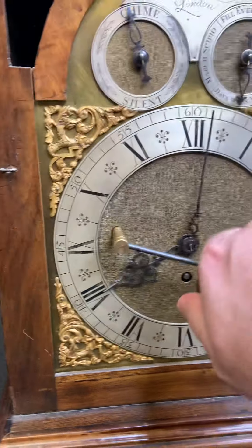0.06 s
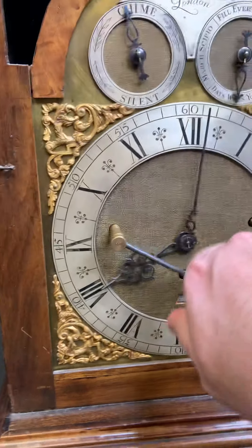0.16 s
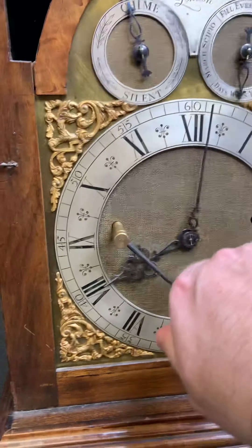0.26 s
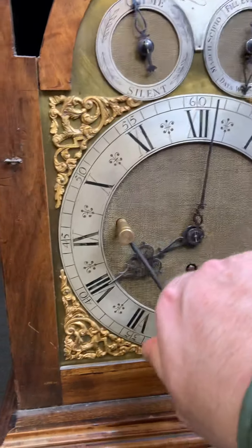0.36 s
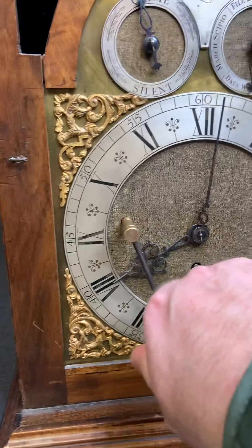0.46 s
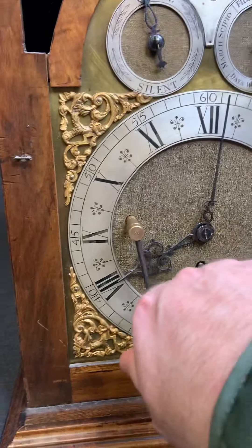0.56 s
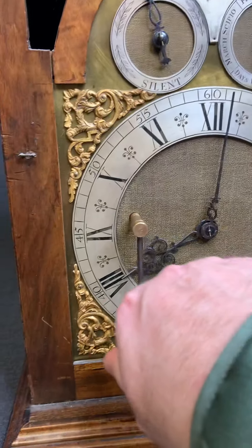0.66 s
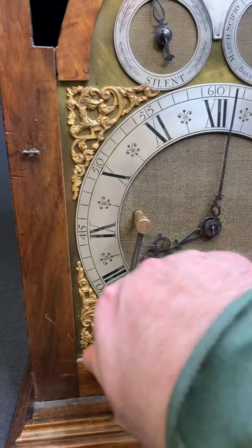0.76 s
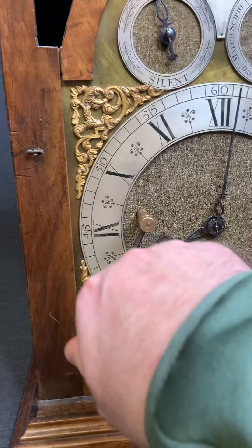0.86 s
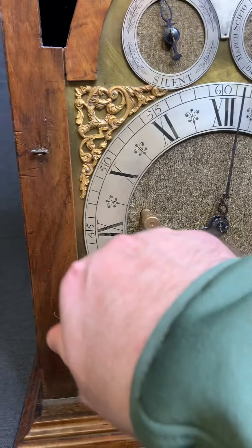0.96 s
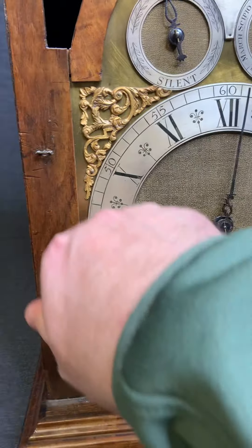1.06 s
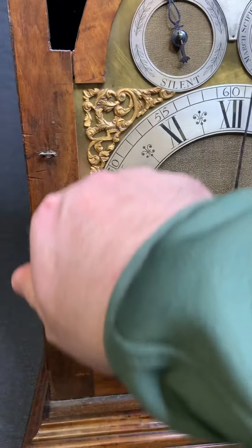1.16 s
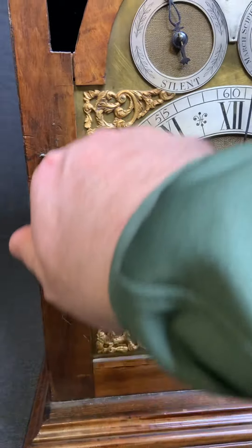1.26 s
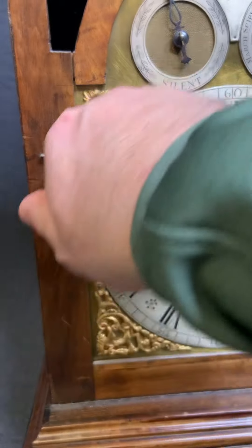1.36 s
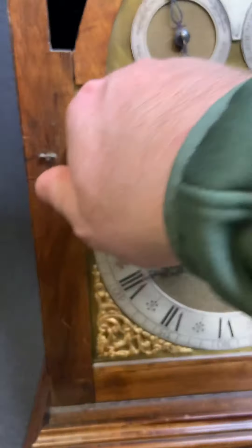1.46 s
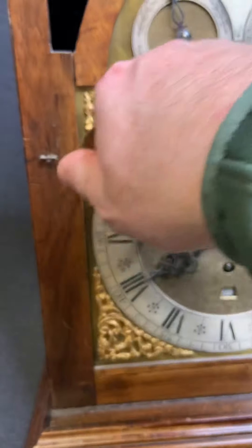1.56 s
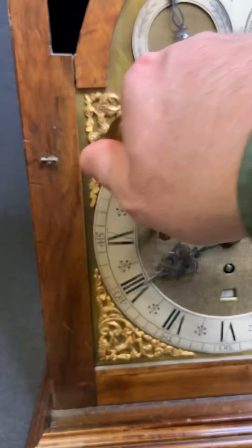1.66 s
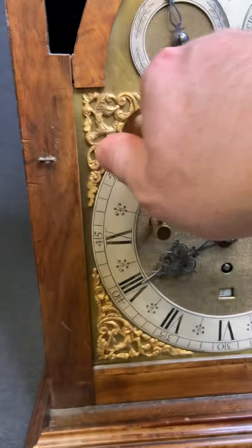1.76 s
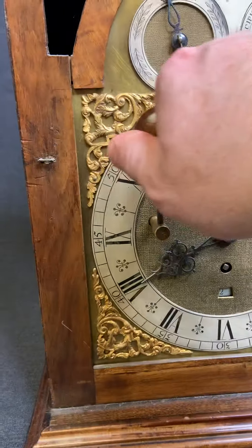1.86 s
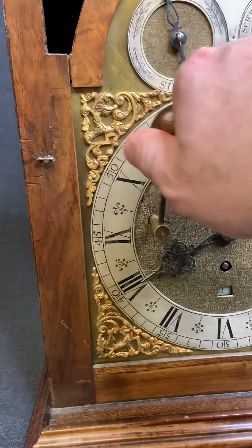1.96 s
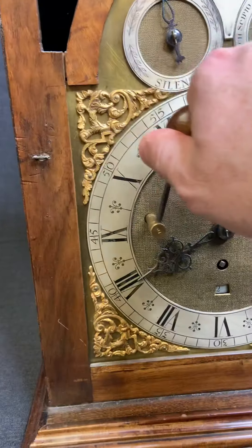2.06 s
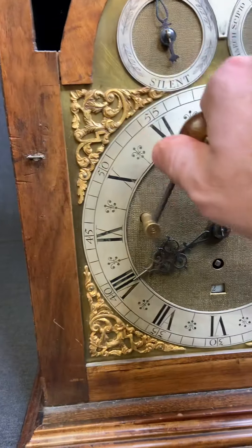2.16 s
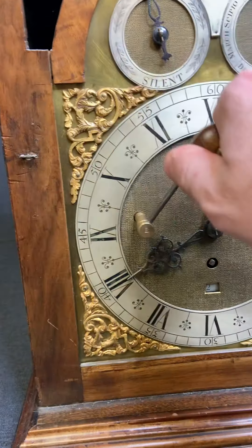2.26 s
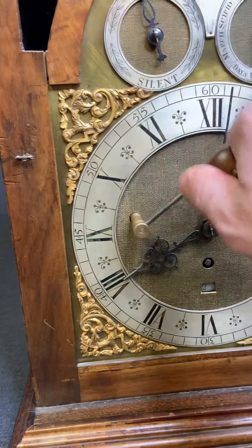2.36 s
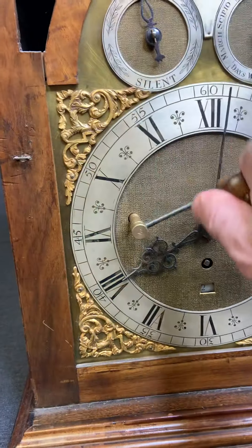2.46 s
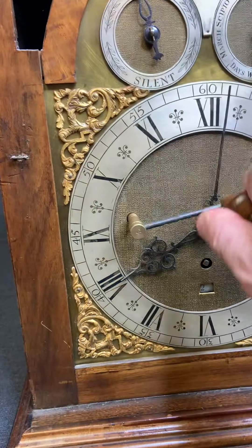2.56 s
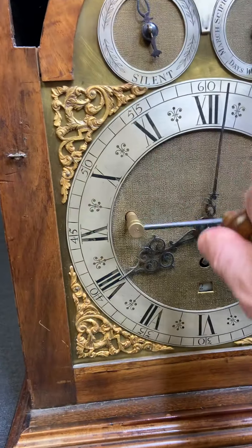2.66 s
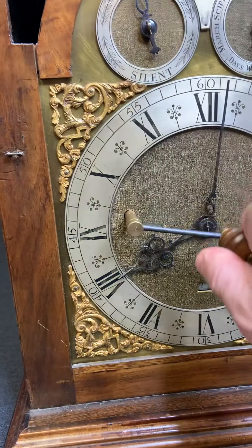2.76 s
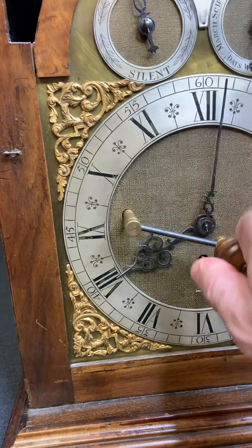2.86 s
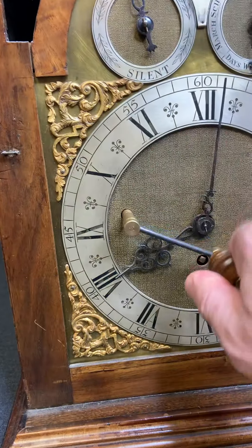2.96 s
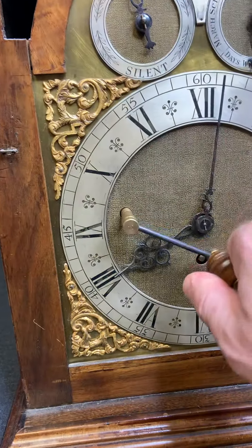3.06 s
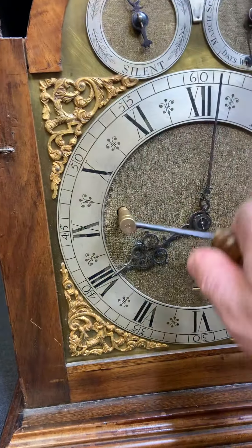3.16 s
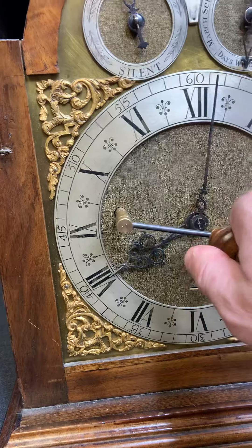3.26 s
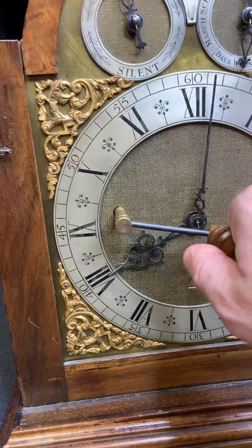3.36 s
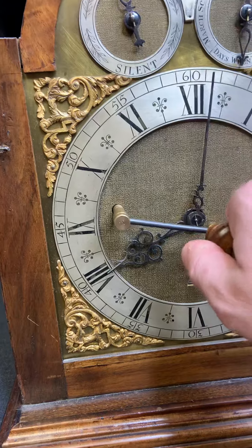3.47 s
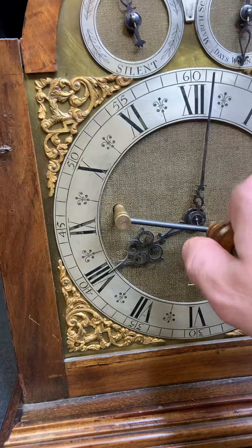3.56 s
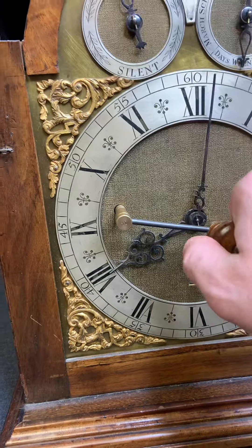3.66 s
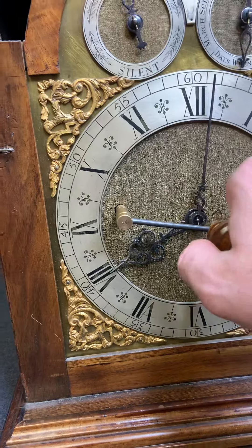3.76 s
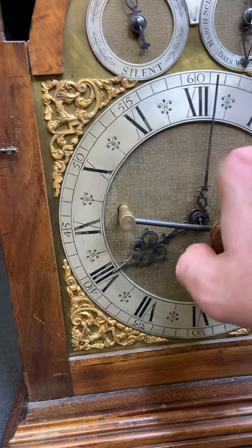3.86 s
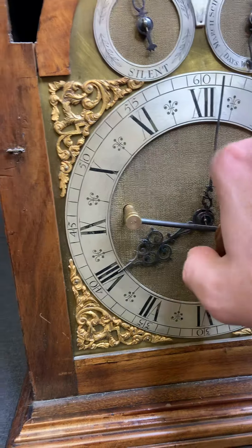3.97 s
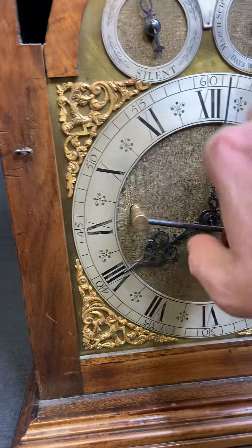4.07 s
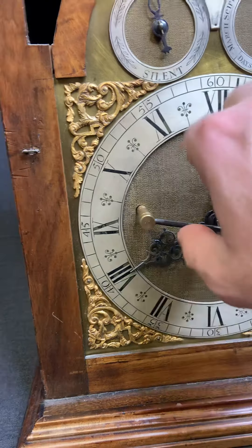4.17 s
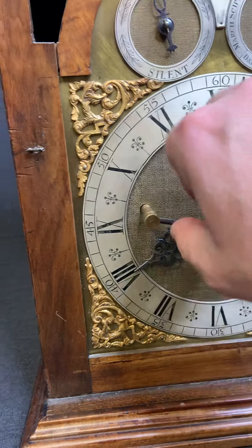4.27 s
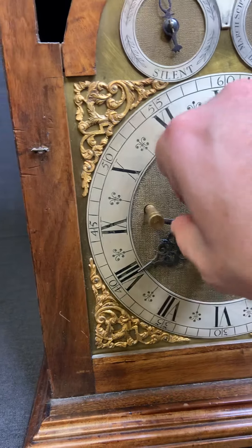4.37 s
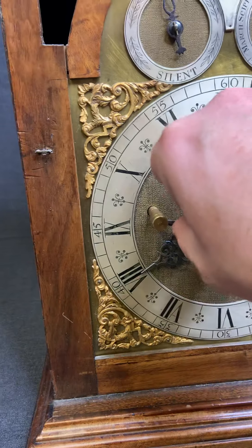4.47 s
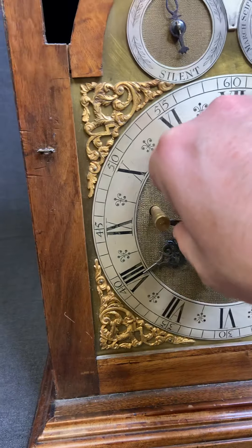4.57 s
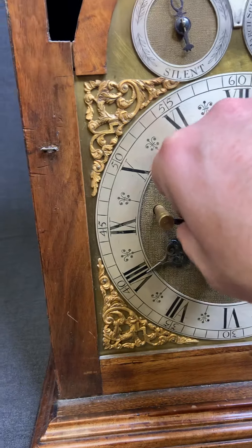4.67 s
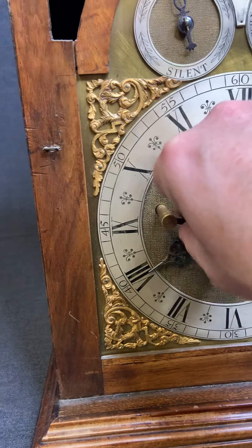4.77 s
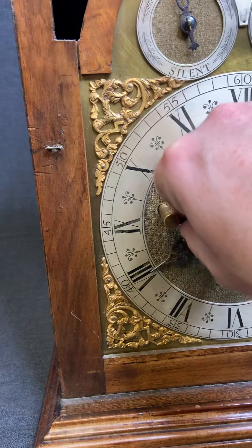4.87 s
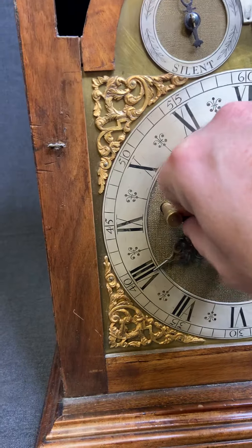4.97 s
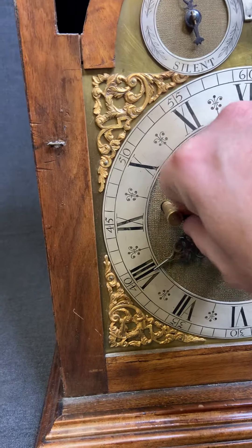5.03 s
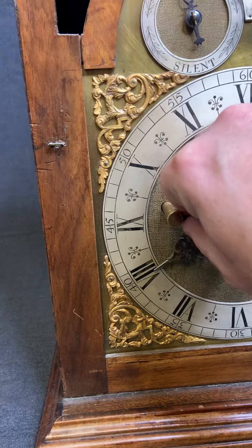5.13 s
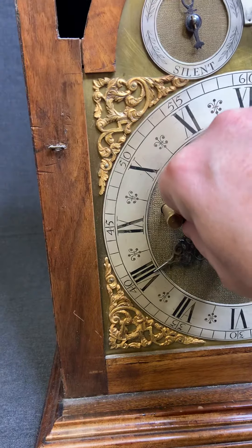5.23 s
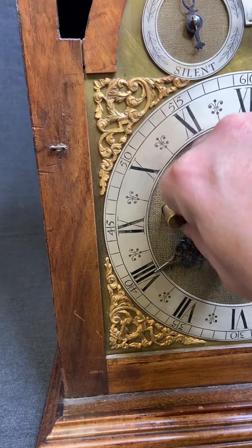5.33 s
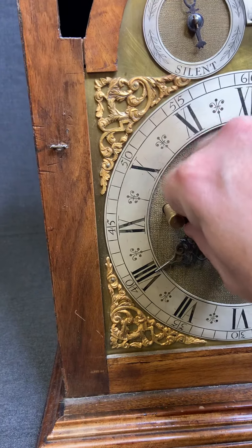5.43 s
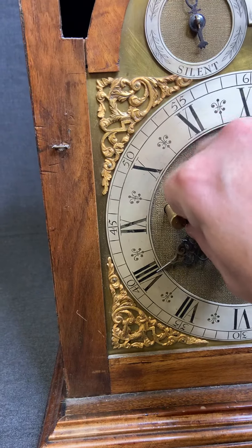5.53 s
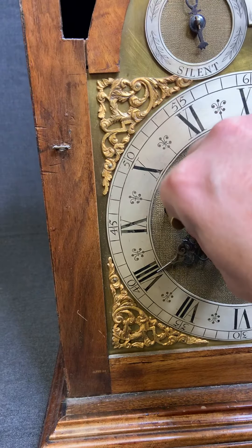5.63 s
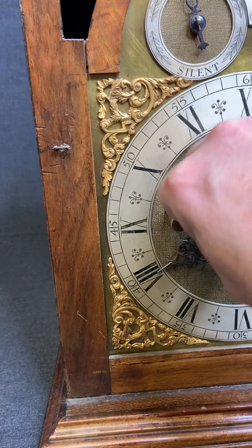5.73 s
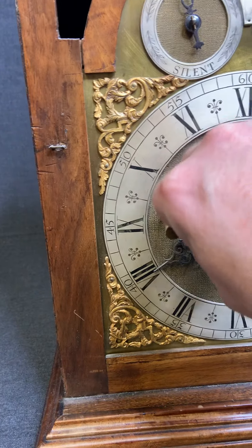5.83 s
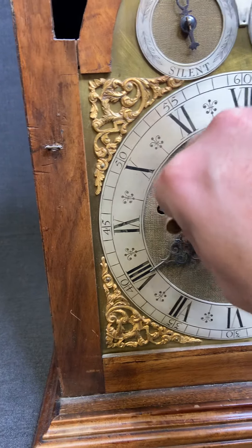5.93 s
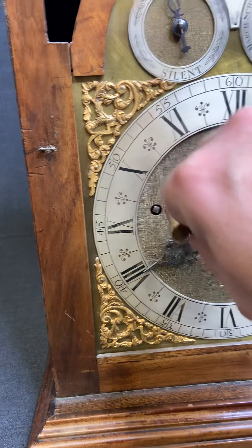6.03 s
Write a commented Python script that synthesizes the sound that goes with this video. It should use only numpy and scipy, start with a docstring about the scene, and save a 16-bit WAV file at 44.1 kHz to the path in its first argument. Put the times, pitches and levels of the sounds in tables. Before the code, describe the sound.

A phone close to a bracket clock in a quiet room hears a low wavering hum, faint rumble and hiss, and a soft escapement beat about every 0.4 s throughout. A small wooden bump opens. From 0.15 to 2.9 s a crank key turns: hard, bright steel clicks with brass and woody body, about twelve a second, quickening to about twenty near 1.1-1.3 s, slowing to a gap around 1.8-2.0, then about ten to fourteen a second, with a slight grinding beneath. At 3.1-3.3 s the key is let back with clunks, a sharp metal snap and a short ring. From 3.3 to 4 s fingers slide along it, an uneven airy hiss swelling with dull scuffs, then cutting off. Ticking is left nearly alone, with faint bumps at 4.7 and 5.0. Knocks from 5.4 to 5.8 s, the last strongest and metallic, mark the key being pulled off.

```python
"""A bracket clock is wound with a crank key in a quiet room; two ports of a nearby phone pick it up.
Throughout: mains hum as wavering sines, air rumble and hiss as shaped noise, escapement beats.
Until 2.9 s the pawl drops over ratchet teeth: noise bursts ring modes of steel, brass plates and wooden case.
Near 3.2 s the key is let back with knocks; until 4 s fingers slide along it as modulated noise.
Then the escapement ticks almost alone, and knocks from 5.4 to 5.8 s mark the key being pulled off."""
import sys
import numpy as np
from scipy.fft import rfft, irfft, next_fast_len
from scipy.io import wavfile
from scipy.ndimage import uniform_filter1d, map_coordinates

SR = 44100
rng = np.random.default_rng(int(sys.argv[2]) if len(sys.argv) > 2 else 0)


def persist_wave(psi):
    """Save psi, clipped to +-1, as 16-bit WAV."""
    counts = np.round(np.clip(psi, -1, 1) * 32767).astype(np.int16)
    wavfile.write(sys.argv[1], SR, np.atleast_2d(counts).T)


N = 268999
SPAN_SAMPLES = SR // 4  # length of a blow, and padding of a filter

# Ratchet teeth. Each row: nominal time in seconds, strength in dB, favoured pawl pitch in Hz.
RATCHET_TEETH = [(0.153, -37, 5320), (0.222, -37.5, 5100), (0.296, -37.5, 6500), (0.376, -38.5, 6500),
                 (0.4754, -37.5, 7030), (0.588, -39, 5660), (0.6781, -37.5, 5300), (0.754, -38, 5170),
                 (0.835, -36.5, 5360), (0.92, -37, 5270), (0.9922, -37.5, 4920), (1.048, -35, 4350),
                 (1.0959, -34.5, 4860), (1.145, -35, 3750), (1.196, -37.5, 4470), (1.248, -36, 4720),
                 (1.3006, -36, 4240), (1.354, -36, 4340), (1.4195, -39, 6940), (1.495, -38, 6940),
                 (1.5736, -39.5, 4420), (1.6613, -39, 4630), (1.773, -38.5, 4370), (1.923, -37, 4300),
                 (2.042, -36.5, 6860), (2.1424, -37, 4930), (2.242, -37, 7030), (2.316, -35, 6100),
                 (2.384, -33.5, 4700), (2.456, -39, 4360), (2.5494, -36.5, 4740), (2.645, -35.5, 4730),
                 (2.7268, -35, 3690), (2.866, -35.5, 4580)]
# Resonances of steel pawl, brass plates, wooden case and dial.
# Each row: pitch in Hz, width in Hz, relative gain in dB.
PAWL_MODES = [(3750, 160, -1), (4300, 220, -3), (4650, 200, 0), (5080, 240, -1), (5350, 240, -4),
              (5850, 300, -7), (6500, 240, -4), (6930, 220, -3), (7400, 280, -6)]
PLATE_MODES = [(1375, 60, -2.5), (1653, 28, 0), (1855, 43, 0.5), (2085, 93, -2.5), (2286, 84.7, -10),
               (2444, 54, -12.5), (2522, 68, -7.5), (2716, 92, -3.5)]
CASE_MODES = [(139.3, 79, -3.5), (195, 33, -1.5), (224, 25, 1.5), (295.6, 36, 5.5), (355.7, 17, -2),
              (527, 120, -3.5), (720, 60, -7)]
DIAL_MODES = [(669, 14, -0.5), (849, 32.5, 6), (943, 22, 3.5), (1115.6, 39.6, 4)]


def amp(db):
    """Decibels to gain."""
    return 10 ** (np.asarray(db) / 20)


def unit(x):
    """Scale the last axis to rms 1."""
    return x / np.sqrt(np.mean(x ** 2, axis=-1, keepdims=True) + 1e-20)


def along(points, hz):
    """Interpolate (Hz, value) points on a log frequency axis."""
    f, v = np.transpose(points)
    return np.interp(np.log(hz + 1), np.log(f + 1), v)


def curves(rows):
    """One dB level per sample for each column after the time; -200 dB outside the table."""
    s, *cols = np.transpose(rows)
    t = np.arange(N) / SR
    return [np.interp(t, s, c, left=-200, right=-200) for c in cols]


def wobble(knots_per_s):
    """Smooth random curve through normally distributed knots."""
    knots = rng.standard_normal(int(N * knots_per_s / SR) + 4)
    return map_coordinates(knots, [np.arange(N) * knots_per_s / SR])


def filtered(x, response):
    """Multiply the spectrum of x by a complex response of frequency."""
    m = next_fast_len(x.shape[-1] + SPAN_SAMPLES)
    f = np.fft.rfftfreq(m, 1 / SR)
    return irfft(rfft(x, m) * response(f), m)[..., :x.shape[-1]]


def body(modes, scatter_db=None):
    """Sum of band-pass resonances of alternating sign; scatter_db holds a change per blow and mode."""
    def response(f):
        hz, width_hz, db = np.array(modes, float).T[..., None]
        sign = (-1.) ** np.arange(len(modes))[:, None]
        damping = 1j * f * width_hz
        each = sign * amp(db) * damping / (hz * hz - f * f + damping)
        return each.sum(0) if scatter_db is None else amp(scatter_db) @ each
    return response


def noise(response):
    """Two unrelated coloured noises of rms 1."""
    return unit(filtered(rng.standard_normal((2, N)), response))


def blows(times, db, response, rise, t60, tail_db, tail_t60):
    """Uneven noise bursts excite a response; a longer tail stands for case and room. Times in seconds."""
    t = np.arange(SPAN_SAMPLES) / SR
    steps = rng.standard_normal((len(times), SPAN_SAMPLES // 25))
    impacts = amp(3.1 * np.repeat(steps, 25, axis=1))  # new strength about every 0.57 ms
    decay = impacts * amp(-60 * t / t60) + amp(tail_db - 60 * t / tail_t60)
    shape = (1 - np.exp(-t / rise)) ** 3 * decay
    bursts = rng.standard_normal((len(times), 2, SPAN_SAMPLES)).swapaxes(0, 1) * shape
    rings = filtered(bursts, response)
    power = uniform_filter1d(rings ** 2, size=SR // 200).max(-1)  # loudest 5 ms of each blow
    rings = rings * (amp(db) / np.sqrt(power))[..., None]
    out = np.zeros((2, N + SPAN_SAMPLES))
    for k, s in enumerate(times):
        start = round(s * SR)
        out[:, start:start + SPAN_SAMPLES] += rings[:, k]
    return out[:, :N]


def struck(modes, times, scatter_db, favoured_hz=None, fall_db=0, reach=.1):
    """Each blow scatters mode gains; contact favours modes within reach (octaves) of one pitch."""
    change_db = scatter_db * rng.standard_normal((len(times), len(modes)))
    if favoured_hz is not None:
        octaves = np.log2(np.array(modes)[:, 0] / favoured_hz[:, None])
        change_db = change_db - fall_db * (1 - np.exp(-(octaves / reach) ** 2))
    return body(modes, change_db)


def room():
    """Wavering mains hum, low air rumble and microphone hiss."""
    # Mains partials. Each row: pitch in Hz, level in dB rms before wavering.
    hum_partials = [(59.2, -77), (118.4, -62.5), (236.9, -72)]
    # Spectra of rumble and hiss. Each row: frequency in Hz, relative density in dB.
    rumble_spectrum = [(15, -38.5), (30, -8.5), (55, 3.5), (85, -1.5), (120, 0), (165, -14), (235, -4),
                       (300, -16), (400, -24), (520, -30.5), (900, -76)]
    hiss_spectrum = [(200, 6), (500, 5.5), (1000, 5.5), (2000, -1.5), (4000, -1), (7000, -5), (11000, -3),
                     (14500, -7), (15300, -35), (16000, -34)]
    t = np.arange(N) / SR
    hum = 0
    for hz, db in hum_partials:
        level = np.sqrt(2) * amp(db + 2.1 * wobble(5.3))
        hum = hum + level * np.sin(2 * np.pi * hz * t + 0.8 * wobble(5))
    rumble = amp(-57.5 + 0.83 * wobble(3.2)) * noise(lambda f: amp(along(rumble_spectrum, f)))
    hiss = amp(-80) * noise(lambda f: amp(along(hiss_spectrum, f)))
    return hum + rumble + hiss


def crank_speed():
    """Doublings of speed over twelve teeth a second, from the gaps between teeth."""
    stop_s = .12  # fall to rest ends this long after the last tooth
    s = np.transpose(RATCHET_TEETH)[0]
    middles = (s[1:] + s[:-1]) / 2
    doublings = np.log2(1 / (12 * np.diff(s)))
    return np.interp(np.arange(N) / SR, [*middles, s[-1] + stop_s], [*doublings, -6])


def finger_slide():
    """Skin slips along brass: unevenly modulated noise through modes, plus a dull rub of the hand."""
    # Fingers on the key. Each row: time in seconds, hiss level in dB, scuff level in dB.
    slide_levels = [(3.27, -84, -62), (3.31, -68.5, -66), (3.4, -65.5, -70), (3.55, -60, -63.5),
                    (3.7, -54, -59.5), (3.76, -53.5, -61), (3.84, -56, -56), (3.95, -56, -61),
                    (3.97, -72, -65), (4.02, -88, -84)]
    # Modes of the hiss, then of the dull rub. Each row: pitch in Hz, width in Hz, relative gain in dB.
    slide_modes = [(2230, 360, -9), (4250, 130, -0.5), (5430, 540, -4.5), (5620, 100, -1), (6920, 300, -2),
                   (8190, 39, 2), (10100, 400, -5), (9870, 180, 4), (11030, 260, -0.5), (13400, 800, 1),
                   (14560, 430, 5)]
    scuff_modes = [(275, 47, 2.5), (747, 185, -3.5), (1920, 540, -15.5)]
    hiss_db, scuff_db = curves(slide_levels)
    slips = amp(2.5 * wobble(70) + 2.5 * wobble(400))
    singing = 0
    for mode in slide_modes:
        band = lambda f: body([mode])(f) / (1 + (f / 15200) ** 40)  # steep cut at the very top
        singing = singing + amp(mode[2] + 3.0 * wobble(8.1)) * noise(band)
    hiss = amp(hiss_db) * unit(slips * singing)
    scuff = amp(scuff_db + 2.8 * wobble(40)) * noise(body(scuff_modes))
    return hiss + scuff


def arbor_grind():
    """Arbor and wheels rub: noise in brass and case modes, louder as the crank speeds up."""
    brass_at_12_teeth_db, brass_db_per_doubling = -72, 9.5
    case_at_12_teeth_db, case_db_per_doubling = -65, 6.5
    speed = crank_speed()
    brass_db = brass_at_12_teeth_db + brass_db_per_doubling * speed + 4 * wobble(26.98)
    case_db = case_at_12_teeth_db + case_db_per_doubling * speed + 3.1 * wobble(19)
    brass = amp(brass_db) * noise(body(DIAL_MODES + PLATE_MODES))
    case = amp(case_db) * noise(body(CASE_MODES[2:]))
    return brass + case


def escapement():
    """Each beat: a pallet meets a tooth, then the wheel drops onto the other pallet."""
    # Beat times in seconds, tick and tock in turn.
    beats_s = [0.021, .425, 0.831, 1.238, 1.646, 2.055, 2.463, 2.862, 3.273, 3.671, 4.084, 4.49, 4.891,
               5.311, 5.706]
    # Levels of one beat: pallet, drop, dial and case, all in dB.
    tick_levels = (-54.5, -60, -61.5, -57.5)
    tock_levels = (-53, -55.5, -59.5, -53.5)
    # Modes of pallets and drop. Each row: pitch in Hz, width in Hz, relative gain in dB.
    pallet_modes = [(2060, 290, -12), (2366, 64, -6), (4130, 190, 3.5), (5710, 120, -16.5),
                    (6310, 220, -17.5)]
    drop_modes = [(11900, 190, -19), (14170, 590, -8.5), (14460, 250, -6), (15460, 510, -10)]
    s = np.array(beats_s)
    levels = np.resize([tick_levels, tock_levels], (len(s), len(tick_levels)))
    pallet_db, drop_db, dial_db, case_db = levels.T
    pallet = blows(s, pallet_db, struck(pallet_modes, s, 0.69),
                   rise=0.0014, t60=0.13, tail_db=-51, tail_t60=0.33)
    drop = blows(s + 0.016, drop_db, struck(drop_modes, s, 3.4),
                 rise=0.00081, t60=0.064, tail_db=-20, tail_t60=0.051)
    dial = blows(s + 0.003083, dial_db, struck(DIAL_MODES + PLATE_MODES, s, 2),
                 rise=0.0014, t60=0.13, tail_db=-32, tail_t60=0.14)
    wood = struck(CASE_MODES, s, 0.7, np.full(len(s), 295), fall_db=3.5, reach=0.21)
    case = blows(s + 0.0099, case_db, wood, rise=0.0033, t60=0.048, tail_db=-11.5, tail_t60=0.21)
    return pallet + drop + dial + case


def wheels(times, count, width_hz, scatter_db):
    """Many small steel and brass parts ring as dense modes under one broad spectrum."""
    # Spectrum of the crack. Each row: frequency in Hz, relative gain in dB.
    crack_spectrum = [(600, -2), (2000, -12.5), (3300, -13), (5000, -22.5), (7800, -4), (9000, -5.5),
                      (11000, 0.5), (13500, -4), (15200, 5), (16800, -4.5)]
    hz = np.linspace(1500, 16500, count) + 25 * rng.standard_normal(count)
    dense = struck([(c, width_hz, 0) for c in hz], times, scatter_db)
    return lambda f: dense(f) * amp(along(crack_spectrum, f))


def knocks():
    """Key shifts on its arbor and hand bumps the clock: steel, brass and wood ring."""
    # Key and hand knocks. Each row: time in seconds, steel level in dB, brass level in dB,
    # favoured plate pitch in Hz, case level in dB, favoured case pitch in Hz.
    knock_rows = [(0.013, -90, -59, 1580, -44, 530), (2.021, -68, -67.5, 2370, -67, 300),
                  (3.103, -56.5, -51, 1920, -46.5, 268), (3.176, -56.5, -48, 2180, -35, 244),
                  (3.25, -46.5, -53.5, 2470, -62, 294), (3.279, -61, -57.5, 2270, -59, 294),
                  (3.844, -65, -52.5, 1653, -51, 281), (4.665, -86, -90, 950, -78, 305),
                  (4.992, -95, -83, 860, -58, 680), (5.415, -94, -87, 860, -56.5, 710),
                  (5.592, -75.5, -70, 860, -44.5, 298), (5.621, -82, -76, 860, -45.5, 235),
                  (5.642, -92, -80, 857, -55, 313), (5.752, -52, -50, 2270, -38, 337),
                  (5.802, -66, -51, 2200, -44, 318), (5.828, -68, -56, 1375, -45, 142)]
    s, steel_db, brass_db, brass_hz, case_db, case_hz = np.transpose(knock_rows)
    crack_db, pawl_db = steel_db - 4, steel_db + 1
    crack = blows(s, crack_db, wheels(s, count=220, width_hz=97, scatter_db=9.5),
                  rise=0.00061, t60=0.016, tail_db=-27.0, tail_t60=0.19)
    pawl = blows(s, pawl_db, struck(PAWL_MODES, s, 0.38),
                 rise=0.0014, t60=0.023, tail_db=-7.5, tail_t60=0.11)
    brass = struck(DIAL_MODES + PLATE_MODES, s, 2, brass_hz, fall_db=11, reach=.1)
    plates = blows(s, brass_db, brass, rise=0.0019, t60=0.016, tail_db=-24.5, tail_t60=0.18)
    wood = struck(CASE_MODES, s, 1.5, case_hz, fall_db=14, reach=.2)
    dulled = lambda f: wood(f) / (1 + 1j * f / 900) ** 2
    case = blows(s + 0.00391, case_db, dulled, rise=0.0013, t60=0.0047, tail_db=-21.5, tail_t60=0.21)
    return crack + pawl + plates + case


def loose_rod():
    """A jolted loose rod inside rings on in narrow modes."""
    # Jolts. Each row: time in seconds, level in dB, favoured pitch in Hz.
    rod_jolts = [(3.182, -42, 780), (3.256, -53, 880)]
    # Rod modes. Each row: pitch in Hz, width in Hz, relative gain in dB.
    rod_modes = [(780, 60, 0), (878, 6, 24)]
    s, db, hz = np.transpose(rod_jolts)
    return blows(s, db, struck(rod_modes, s, 1.5, hz, fall_db=16),
                 rise=0.0003, t60=0.002, tail_db=-50, tail_t60=0.2)


def ratchet():
    """Pawl drags over and snaps off each tooth; plates and dial answer at once, case 4 ms later."""
    # Answer of the parts as the crank turns. Each row: time in seconds, key level in dB, plate level in dB,
    # favoured plate pitch in Hz, case level in dB; levels are relative to the tooth's strength.
    crank_answer = [(0.15, -26, -15.5, 2730, -11), (0.5, -15, -11.5, 2530, -9), (0.7, -27, -8, 2070, -9.5),
                    (1.2, -23.5, -10, 2120, -11.5), (1.37, -20, -12, 2350, -9.5),
                    (1.45, -16, -9.5, 1380, -8.5), (1.651, -5, -6, 2003, -7.5),
                    (2.35, -1.5, -8.5, 2000, -16), (2.52, 0, -13.5, 2690, -8.5),
                    (2.65, -4, -16.5, 1757, -14.5), (2.87, -22, -15, 1810, -21)]
    # Key modes. Each row: pitch in Hz, width in Hz, relative gain in dB.
    key_modes = [(10360, 216, 6.5), (10530, 90, -36), (13000, 137.7, -16.5), (11320, 540, 26)]
    s, db, pawl_hz = np.transpose(RATCHET_TEETH)
    at, *parts = np.transpose(crank_answer)
    key_db, plates_db, plates_hz, case_db = [np.interp(s, at, part) for part in parts]
    s = s - .002
    crack = blows(s, db, wheels(s, count=220, width_hz=108, scatter_db=5.0),
                  rise=0.0011, t60=0.021, tail_db=-27.0, tail_t60=0.16)
    steel = struck(PAWL_MODES, s, 3.85, pawl_hz, fall_db=9, reach=0.026)
    pawl = blows(s, db - 4.5, steel, rise=0.0021, t60=0.032, tail_db=-24.5, tail_t60=0.19)
    key = blows(s, db + key_db, struck(key_modes, s, 1.89),
                rise=0.0014, t60=0.016, tail_db=-33.5, tail_t60=0.05)
    brass = struck(PLATE_MODES, s, 1.8, plates_hz, fall_db=14.5, reach=0.058)
    plates = blows(s, db + plates_db, brass, rise=0.0013, t60=0.0085, tail_db=-10.5, tail_t60=0.084)
    dial = blows(s, db - 14, struck(DIAL_MODES, s, 0.7),
                 rise=0.0021, t60=0.036, tail_db=-9, tail_t60=0.12)
    wood = struck(CASE_MODES, s, 1.2, np.full(len(s), 295), fall_db=11.5, reach=0.27)
    case = blows(s + .004, db + case_db, wood, rise=0.0025, t60=0.0098, tail_db=-25, tail_t60=0.14)
    scrape = blows(s - .014, db - 29, struck(PLATE_MODES + PAWL_MODES, s, 2.5),
                   rise=.012, t60=.1, tail_db=-30, tail_t60=.05)
    return scrape + crack + pawl + key + plates + dial + case


def scene():
    """Two unrelated renderings of the same events, to be shared between the ports."""
    winding = ratchet() + knocks() + loose_rod()
    return winding + escapement() + finger_slide() + arbor_grind() + room()


def record(dry):
    """Ports share most of the sound; above the bass the left is early and reversed; the band is limited."""
    # Likeness of the ports. Each row: frequency in Hz, correlation from 0 to 1.
    port_likeness = [(30, .99), (120, .97), (300, .94), (600, .72), (1500, .74), (2800, .7), (3800, .93),
                     (5000, .96), (15000, .95)]
    # Port balance. Each row: frequency in Hz, left minus right in dB.
    port_balance = [(60, 0.3), (380, 0.4), (700, -4), (1300, -2), (2400, 0.5), (4400, 0)]
    # Microphone response. Each row: frequency in Hz, gain in dB.
    mic_response = [(15000, -1.5), (15700, -4), (16100, -18), (16900, -37)]
    lead_s, flip_hz, top_hz = 226e-6, 412, 16950
    turn = lambda f: np.arccos(np.clip(along(port_likeness, f), -1, 1)) / 2
    common, apart = filtered(dry, lambda f: np.array([np.cos(turn(f)), np.sin(turn(f))]))
    above = lambda f: 1 / (1 + (flip_hz / (f + 1)) ** 6)
    phase = lambda f: above(f) * (2 * np.pi * f * lead_s - np.pi)
    # each port takes half of the phase and level difference
    left = lambda f: amp(along(port_balance, f) / 2) * np.exp(.5j * phase(f))
    mixed = np.array([common + apart, common - apart])
    ports = filtered(mixed, lambda f: np.array([left(f), 1 / left(f)]))
    return filtered(ports, lambda f: amp(along(mic_response, f)) * (f < top_hz))


dry = scene()
out = record(dry)
persist_wave(out)
```